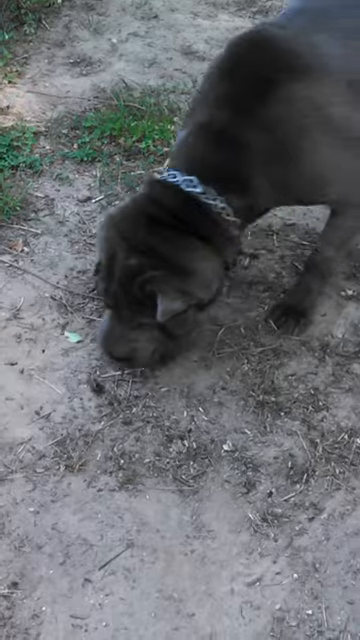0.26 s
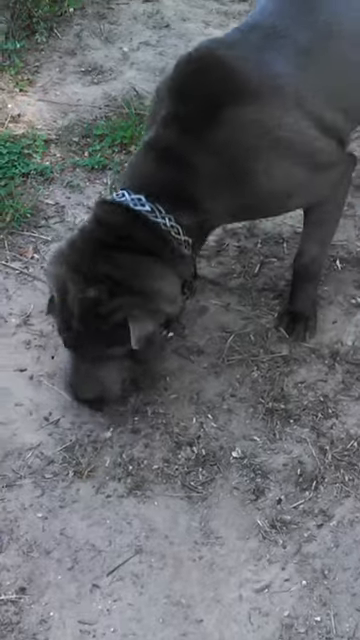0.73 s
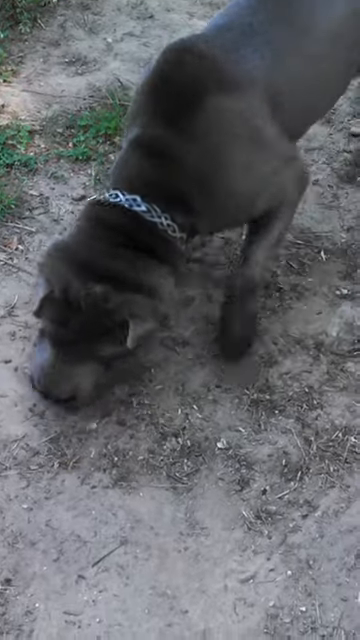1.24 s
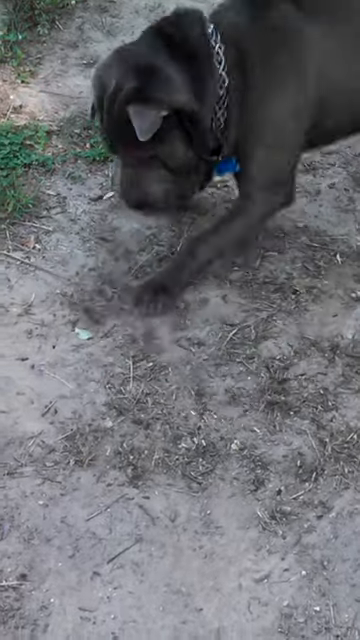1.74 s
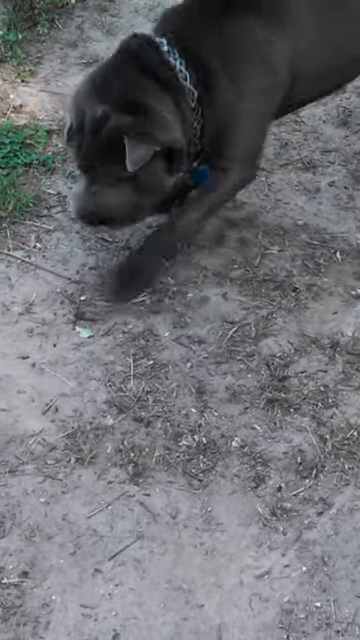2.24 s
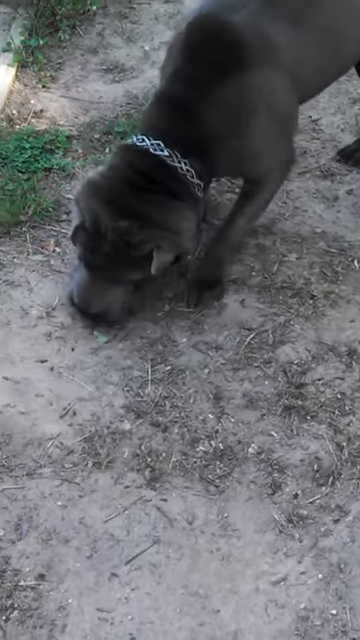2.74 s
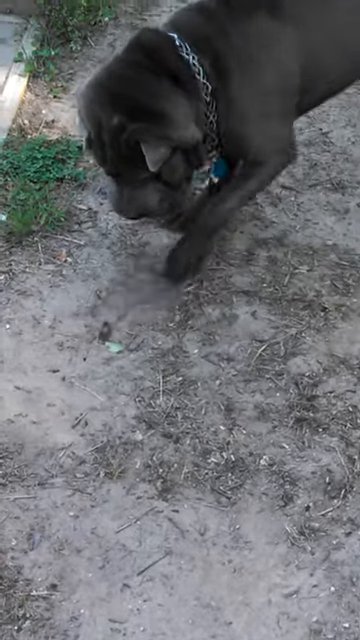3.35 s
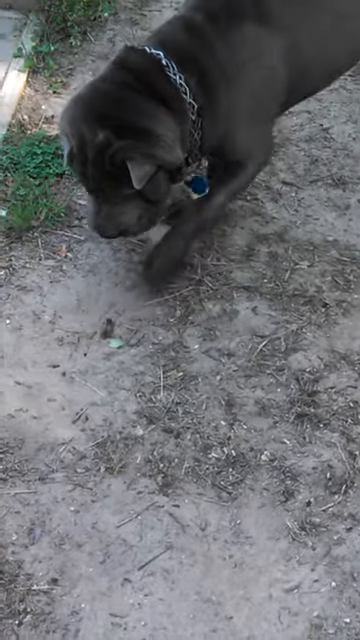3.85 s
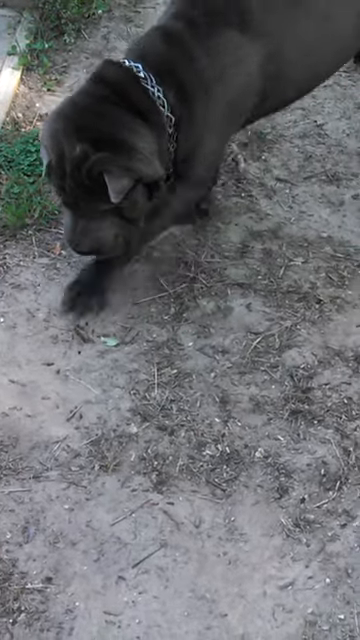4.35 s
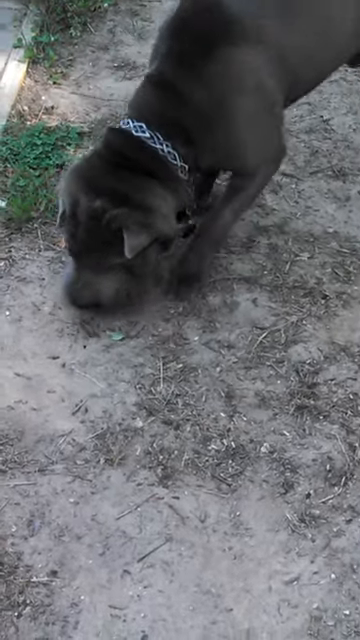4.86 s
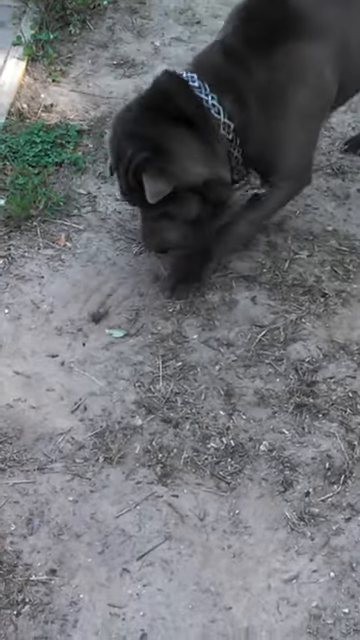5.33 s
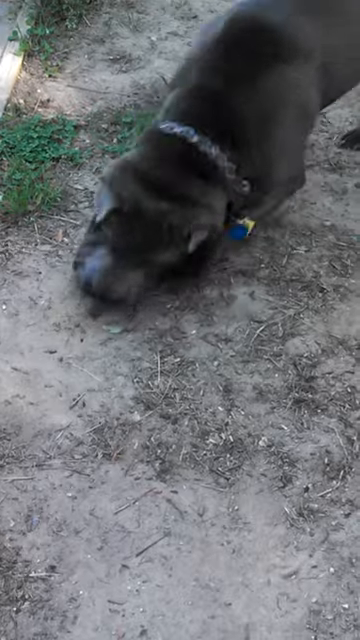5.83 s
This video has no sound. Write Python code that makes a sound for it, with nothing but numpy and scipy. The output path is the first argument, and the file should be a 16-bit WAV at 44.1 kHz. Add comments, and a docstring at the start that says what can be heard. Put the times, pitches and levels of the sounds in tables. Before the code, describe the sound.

Outdoors, a handheld phone catches a dog scratching and nosing in dry dirt. Soft scuffs come first, then bright collar-tag clinks and one hard tap near one and a half seconds. Pawing grows stronger and grittier from the middle onward, with dry twig cracks and short breathy sniffs. Small birds chirp and whistle behind, over a steady distant machine drone.

```python
"""Metal collar tags clink while a dog paws and noses through dry dirt and twigs; a machine drones far off,
small birds whistle, something taps sharply once. Drone, air, grit and breath are noise filtered into bands
and resonances; tags are decaying modes; birds are gliding near-sines; cracks are filtered bursts of impulses.
A handheld phone hears it at two ports, the left one facing the dog, and widens its stereo by taking
a delayed copy of each port from the other."""
import sys
import numpy as np
from scipy import signal
from scipy.fft import rfft, irfft, next_fast_len
from scipy.io import wavfile
from scipy.ndimage import uniform_filter1d

SR = 44100
rng = np.random.default_rng(int(sys.argv[2]) if len(sys.argv) > 2 else 0)


def log_audio(samples):
    """Write samples as a 16-bit WAV file to the path given in sys.argv[1]."""
    # one column per channel
    frames = np.atleast_2d(samples).T
    # limit to full scale, then quantise
    limited = np.clip(frames, -1, 1)
    pcm = np.round(limited * 32767).astype(np.int16)
    wavfile.write(sys.argv[1], SR, pcm)


def level_to_linear(level):
    """Convert decibel levels to linear amplitude factors, elementwise."""
    exponent = np.asarray(level, float) / 20
    return 10 ** exponent


N = 268569
TIME = np.arange(N) / SR
SIZE = next_fast_len(N)
FREQ = np.maximum(np.arange(SIZE // 2 + 1) * SR / SIZE, 1)
TOP_HZ = 15550  # top of the band


def on_log(table, column):
    """Interpolates a table column over log frequency, as hearing spaces pitch."""
    rows = np.array(table, float)
    return np.interp(np.log(FREQ), np.log(rows[:, 0]), rows[:, column])


def colour(x, db):
    """Linear filtering: weighs each spectral bin by its dB and removes all above the top of the band."""
    return irfft(rfft(x, SIZE) * level_to_linear(db) * (FREQ < TOP_HZ), SIZE)[..., :N]


def walk(rate):
    """Slow random modulation: levels held 1 / rate s, then slewed twice; spread near 1."""
    hold = int(SR / rate)
    steps = np.repeat(rng.standard_normal(N // hold + 1), hold)
    return 1.713 * uniform_filter1d(uniform_filter1d(steps, hold), hold)[:N]


def facing(x, other, lag_ms, far_db, alike):
    """Arrival delay, shadowing and coherence: the right port hears x later, weaker, partly by other paths."""
    alike = np.clip(alike, 0, 1)
    late = np.interp(TIME - lag_ms / 1000, TIME, x)
    right = level_to_linear(far_db) * (alike * late + np.sqrt(1 - alike ** 2) * other)
    return np.array([x, right])


def bounces(t, length_s):
    """Repeated impact: a first strike and quick, exponentially fading bounces; energy 1."""
    hits = rng.standard_normal(len(t)) * (rng.random(len(t)) < .2) * np.exp(-t / length_s)
    hits[0] += 2.2
    return hits / np.sqrt(np.sum(hits ** 2))


def air():
    """Resonance and coherence: noise through drone resonances, shared between the ports band by band."""
    # outdoor air at the ports: pitch_hz, half_sum_db_per_hz, half_difference_db_per_hz,
    # lean (-1 to 1, positive to the left)
    air_bands = [(20, -100, -99, -0.038), (45.4, -60, -69.5, 0.13), (124, -46.5, -69, 0.34),
                 (251.6, -71, -83.5, 0.31), (449, -76.5, -83.5, 0.39), (648, -83, -92, 0.29),
                 (1227, -86, -84, 0.55), (1720, -95.5, -91, -0.45), (3150, -96, -101.5, 1),
                 (5300, -100, -101, 1), (8300, -101.5, -99.5, 0.53), (11250, -103, -102, 0.69),
                 (13000, -95, -93, -0.42), (16300, -99, -106, -.2)]
    # drone resonances: pitch_hz
    drone_hz = [128, 190, 229, 365, 447, 475, 560, 600, 639, 680, 710, 748, 796, 830, 866, 950, 982, 1100,
                1172, 1303, 1362, 1490, 1570, 1721]
    # the same resonances: width_hz (at half height), level_db (over the air; negative is a hollow)
    drone_shape = [(127, -20), (11.8, 3), (9, 10.5), (10, 9.5), (8, 10.5), (8, 0.5), (10, 13), (11.6, 14.5),
                   (9.9, 13.5), (11.9, 12), (12, 11), (10, 8.5), (7.9, 12.5), (8, 1), (10, 4.5), (12, 3),
                   (10, 7.5), (20, 7.5), (14, 6), (28, 10.5), (16, 7), (8, 9), (20, 6.5), (20, 11)]
    lead_hz = 900  # below this the lean is an earlier arrival, above it a louder port

    ring = 0
    for hz, (width, db) in zip(drone_hz, drone_shape):
        ring = ring + (level_to_linear(db) ** 2 - 1) / (1 + ((FREQ - hz) / (width / 2)) ** 2)
    white = rng.standard_normal((2, N)) * np.sqrt(SR / 2)  # 0 dB per Hz
    one, two = colour(white, 10 * np.log10(np.maximum(1 + ring, .1)))

    lean = np.clip(on_log(air_bands, 3), -1, 1)
    shared = rfft(one, SIZE) * lean * np.where(FREQ < lead_hz, 1j, 1)  # 1j: a quarter-cycle phase shift
    separate = rfft(two, SIZE) * np.sqrt(1 - lean ** 2)
    apart = irfft(shared + separate, SIZE)[:N]
    mid = colour(one, on_log(air_bands, 1))
    side = colour(apart, on_log(air_bands, 2))
    return np.array([mid + side, mid - side]) * level_to_linear(0.44 * walk(3.136))


def hum():
    """Frequency and amplitude modulation: the drone's one steady note drifts and flutters a little."""
    # course of the note before its drift: time_s, pitch_hz
    hum_course = [(0, 330), (3.8, 331), (4.2, 334), (5.6, 333.5), (6.09, 330.5)]
    level_db, drift_hz, flutter_db = -44.8, 1.3, 2.3
    pitch = np.interp(TIME, *np.transpose(hum_course)) + drift_hz * walk(1.458)
    return level_to_linear(level_db + flutter_db * walk(10)) * np.sin(2 * np.pi * np.cumsum(pitch) / SR)


def chatter():
    """Modulated narrow-band noise: far small birds blur into chirps that come and go in a few ranges."""
    # ranges: centre_hz, width_hz (distance at which the range is 4.3 dB down), level_db (before flutter)
    ranges = [(2370, 350, -60.5), (3080, 170, -65.5), (4300, 820, -71), (5000, 140, -71.5)]
    out = 0
    for hz, width, db in ranges:
        blur = colour(rng.standard_normal((2, N)), -4.3 * ((FREQ - hz) / width) ** 2)
        flutter = level_to_linear(2.2 * walk(30) + walk(2))
        out = out + level_to_linear(db) * blur / blur.std() * flutter
    return out


def glides(calls):
    """Exponential pitch relaxation: falls drop fast and level out, rises climb almost evenly."""
    u, notes = np.linspace(0, 1, 40), []
    for s, length, from_hz, to_hz, db in calls:
        settle = .3 if from_hz > to_hz else 3.  # time constant as a share of the call
        left = (np.exp(-u / settle) - np.exp(-1 / settle)) / (1 - np.exp(-1 / settle))
        notes.append((s, length, to_hz + (from_hz - to_hz) * left, db))
    return notes


def birds(notes, rough_db, wobble_hz, right_db, lag_ms, trees_db):
    """Modulation and scattering: near-sines flutter in level and pitch, and the trees smear them."""
    song, wobble = np.zeros(N), wobble_hz * walk(600)
    for s, length, hz, db in notes:
        now = (TIME >= s) & (TIME < s + length)
        t = TIME[now]
        ends = np.clip(np.minimum(t - s, s + length - t) / min(.007, length / 4), 0, 1)
        pitch = np.interp(t, np.linspace(s, s + length, len(hz)), hz) + wobble[now]
        song[now] += ends * level_to_linear(db) * np.sin(2 * np.pi * np.cumsum(pitch) / SR)
    song = song * level_to_linear(rough_db * walk(60))
    # the left port hears the song later, the right one louder
    direct = np.array([np.interp(TIME - lag_ms / 1000, TIME, song), level_to_linear(right_db) * song])
    echo = rng.standard_normal((2, 6000)) * np.exp(-TIME[:6000] / .03) * level_to_linear(trees_db)
    return direct + signal.fftconvolve(song[None], echo, axes=1)[:, :N]


def whistles():
    """Tonal calls as pitch contours: evenly repeated falling cheeps, clear slurs and dipping whistles."""
    # one bird's repeated cheep: length_s, from_hz, to_hz, level_db
    length, from_hz, to_hz, db = (.08, 2250, 1800, -64.5)
    first_s, every_s, count = -.015, .34, 7
    # clear slurs up or down: start_s, length_s, from_hz, to_hz, level_db
    slurs = [(0.15, 0.17, 2600, 2540, -63), (.41, 0.036, 2700, 2600, -66), (0.59, 0.065, 1920, 3330, -53.5),
             (0.867, 0.038, 3350, 2940, -53.5), (0.892, 0.068, 2430, 2270, -52.5),
             (1.115, 0.07, 1896, 3300, -53), (1.178, 0.052, 3240, 2950, -57),
             (1.85, 0.055, 2400, 2570, -63), (1.9, .065, 2460, 2270, -59), (2.006, 0.075, 3000, 2430, -62),
             (2.053, 0.052, 2120, 2400, -53.5), (2.41, 0.055, 2510, 2320, -52.5),
             (2.45, 0.39, 2510, 2520, -67), (3.208, 0.17, 3170, 2500, -52.5),
             (3.697, 0.036, 2720, 2680, -58), (3.743, 0.042, 3660, 3730, -66),
             (3.787, 0.019, 2170, 2080, -55), (3.797, 0.039, 3140, 3230, -54.5),
             (3.836, .012, 3150, 2900, -54), (3.5, .03, 2250, 2150, -56), (3.895, .02, 1755, 1650, -55),
             (3.908, 0.084, 3330, 2620, -54), (3.985, 0.045, 2510, 2446, -55),
             (4.06, .032, 2480, 2490, -61), (3.993, 0.095, 3150, 3020, -59),
             (5.225, 0.017, 2350, 2240, -52), (5.47, .05, 2550, 2480, -64), (5.392, .15, 2940, 3026, -61.5),
             (5.646, 0.13, 3040, 2960, -61), (5.88, .2, 2950, 3020, -60), (5.445, 0.018, 2500, 2250, -51),
             (5.83, 0.018, 2200, 2110, -52), (6.02, 0.072, 2470, 2520, -58.5)]
    # a whistle that dips and rises again: share (of the note, 0 to 1), pitch_hz
    dip_shape = [(0, 2150), (.08, 2450), (.2, 2250), (.4, 2146), (.6, 2195), (.87, 2430), (1, 2340)]
    # dipping whistles: start_s, length_s, level_db
    dip_whistles = [(2.87, .18, -56), (3.495, .175, -55.5)]

    notes = [(first_s + k * every_s, length, [from_hz, to_hz], db) for k in range(count)]
    notes += glides(slurs)
    dip_hz = np.interp(np.linspace(0, 1, 40), *np.transpose(dip_shape))
    notes += [(s, length, dip_hz, db) for s, length, db in dip_whistles]
    return birds(notes, rough_db=2.8, wobble_hz=45, right_db=7, lag_ms=.05, trees_db=-30)


def peeps():
    """Random frequency modulation: a wider pitch wobble makes thinner, hoarser, higher calls."""
    # calls: start_s, length_s, from_hz, to_hz, level_db
    calls = [(.3, 0.059, 4150, 4030, -63.5), (.435, 0.081, 5750, 5670, -62), (.15, .06, 5400, 5250, -61),
             (.57, 0.074, 5090, 4830, -52), (.62, 0.061, 4900, 4590, -62), (.77, 0.13, 4090, 4000, -66),
             (.85, 0.13, 5750, 5500, -49.5), (3.3, 0.13, 4300, 3930, -64.5), (3.66, 0.056, 3980, 4100, -64),
             (3.7, 0.11, 4450, 4250, -63.5), (3.72, 0.042, 4130, 4100, -68), (3.69, 0.052, 4800, 4600, -69),
             (3.84, 0.043, 4300, 4040, -71), (3.93, 0.043, 4600, 4040, -77), (3.79, 0.027, 5050, 5450, -49),
             (3.815, 0.045, 5450, 5270, -57), (4.23, 0.033, 4150, 4000, -67),
             (4.58, 0.055, 5600, 5600, -63), (5.44, .07, 5550, 5500, -65), (5.58, 0.086, 4200, 4080, -66),
             (5.96, .07, 3650, 3830, -65), (5.995, 0.036, 4500, 4650, -60), (5.73, 0.068, 5400, 5320, -61),
             (6.01, 0.2, 4950, 5000, -58), (6.04, 0.046, 5550, 5640, -46.5)]
    return birds(glides(calls), rough_db=2.1, wobble_hz=68.6, right_db=6, lag_ms=0.025, trees_db=-25)


def strokes():
    """Power addition: strokes swell, hold and die over a faint shuffle; returns treble and lower gains."""
    # paw strokes and nosing in the dirt: start_s, length_s, level_db (of the treble),
    # brightness_db (treble gain over lower gain)
    paw_strokes = [(0.335, 0.1, -54.5, -10), (0.618, 0.31, -56.5, -10), (0.979, 0.27, -48.5, -5),
                   (1.114, 0.49, -56.5, -3), (1.435, 0.26, -46.5, 1.5), (2.085, 0.11, -52.5, 1),
                   (2.155, 0.2, -58, 6), (2.21, 0.032, -52, 14), (2.373, 0.091, -65, 1),
                   (2.685, 0.15, -60, 1), (2.864, 0.073, -56.5, 9), (2.948, 0.48, -52.5, -4),
                   (3.422, 0.18, -43, -1.5), (3.622, 0.12, -53, 6), (3.811, 0.24, -45, 2),
                   (4.02, 0.14, -53, 7), (4.138, 0.11, -51, 1), (4.23, 0.22, -40.5, 2),
                   (4.336, 0.19, -44, 14), (4.802, 0.13, -55.5, 10), (4.918, 0.12, -48.5, 14),
                   (5.082, 0.17, -42, -1), (5.163, 0.22, -46, -4.5), (5.476, 0.22, -52, -1),
                   (5.634, 0.053, -53, 9), (5.695, 0.064, -61, 7), (5.791, 0.064, -47, 15),
                   (5.843, 0.18, -57, 10), (5.976, 0.51, -47, 1)]
    rise, fall = 0.26, 0.39  # shares of a stroke's length
    shuffle_db, shuffle_bright_db = -70.5, 28  # faint steady shifting
    high, low = level_to_linear(shuffle_db) ** 2, level_to_linear(shuffle_db - shuffle_bright_db) ** 2
    for s, length, db, bright_db in paw_strokes:
        u = (TIME - s) / length
        swell = np.clip(np.minimum(u / rise, (1 - u) / fall), 0, 1)
        power = swell ** 4 * level_to_linear(db) ** 2
        high, low = high + power, low + power / level_to_linear(bright_db) ** 2
    return np.sqrt(high), np.sqrt(low)


def scuff():
    """Granular friction: dense random grit grains over a dusty hiss that clumps band by band."""
    # tint of the grit: pitch_hz, level_db
    tint = [(600, -38), (1500, -2.5), (3400, 1), (4800, -3), (6500, -1), (9000, 5.5), (10500, 0),
            (11700, 0), (13100, 0), (15400, 2)]
    high_gain, low_gain = strokes()

    chosen = rng.random((2, N)) < 2500 / SR  # about 2500 grains a second at each port
    sizes = level_to_linear(3.2 * np.minimum(rng.exponential(size=(2, N)), 3.8))
    grains = rng.standard_normal((2, N)) * chosen * sizes

    dust, edges = rfft(rng.standard_normal((2, N)), SIZE), np.geomspace(1500, 16000, 9)
    clumps = 0
    for lo, hi in zip(edges, edges[1:]):
        band = irfft(dust * (FREQ >= lo) * (FREQ < hi), SIZE)[:, :N]
        clumps = clumps + band * level_to_linear(2.5 * walk(25))

    grit = level_to_linear(-3) * grains / grains.std() + clumps * level_to_linear(1.5 * walk(50))
    grit = colour(grit, on_log(tint, 1))
    low = signal.sosfilt(signal.butter(2, 5600, fs=SR, output="sos"), grit)
    grit = low * low_gain + (grit - low) * high_gain
    return facing(grit[0], grit[1], lag_ms=0.18, far_db=-31, alike=0.08)


def tags():
    """Modal vibration: each clink cracks and rings the modes of the tags; fur damps the ring."""
    # tag modes: pitch_hz
    mode_hz = [8550, 10310, 10540, 11705, 12170, 12610, 14760, 14895, 15000]
    # the same modes: t60_s (at freedom 1), level_db (added to the clink's group level)
    mode_decay = [(0.04, -9), (0.045, 4), (.025, -3), (0.04, 5), (.06, 2), (.035, -4), (0.04, -1), (.04, 4),
                  (.05, -1)]
    # the same modes: group (0 low, 1 middle, 2 top)
    mode_group = [0, 0, 0, 1, 1, 1, 2, 2, 2]
    # clinks: start_s, crack_peak_db, low_db, middle_db, top_db (mode groups),
    # freedom (to ring; multiplies t60, at most 2)
    clinks = [(0.1126, -30, -57, -55, -54, .4), (1.429, -28, -56, -46, -43, 0.32),
              (1.5155, -30, -50, -54, -36, .3), (1.524, -30, -26.5, -33, -47, 1.1),
              (1.532, -33, -42, -38, -36, .5), (1.541, -46, -50, -43, -45, 1.),
              (1.5918, -25, -44, -26, -42, 0.45), (1.5958, -34, -46, -42, -42, .6),
              (1.625, -46, -48, -56, -56, .4), (2.112, -44, -47, -50, -50, 0.72),
              (2.234, -46, -51, -52, -41, 1), (2.2479, -16, -33, -23, -30, 0.76),
              (2.2532, -34, -42, -40, -36, .6), (2.2625, -33, -38, -41, -40, 1.4),
              (2.3, -34, -46, -39, -50, .2), (2.3465, -46, -58, -49, -56, 1.5),
              (2.4094, -57, -62, -53, -66, 0.37), (2.4445, -40, -65, -54, -54, .5),
              (2.456, -48, -53, -54, -54, 0.71), (2.923, -26, -56, -37.5, -60, 0.61),
              (3.04, -38, -45, -42, -54, 0.57), (3.6425, -36, -43, -43, -38, .3),
              (3.6693, -31, -37, -29, -39, .5), (3.677, -50, -32, -57, -40, 2.5),
              (3.702, -40, -47, -42, -51, 0.55), (3.716, -42, -56, -43, -58, .3),
              (4.0425, -44, -51, -53, -49, 0.55), (4.139, -45.5, -44.5, -53, -47, 0.97),
              (4.181, -34, -40, -34, -42, .3), (4.201, -26, -38, -42, -48, .35),
              (4.5755, -16.5, -53, -36, -53, 0.34), (5.177, -40, -60, -43, -58, .4),
              (5.29, -50, -47, -62, -56, .8), (5.498, -52.5, -62, -38, -55, 0.81),
              (5.5514, -46, -56, -48, -54, .7), (5.644, -40, -44, -52, -45, .3),
              (5.649, -16, -29, -47, -32, .35), (5.6515, -26, -29, -46, -35, 0.33),
              (5.6543, -17, -32, -35, -34, 0.31), (5.66, -38, -52, -47, -52, .25),
              (5.711, -32, -40.5, -49, -43, 2.4), (5.715, -40, -39, -40, -47, 0.71),
              (5.7814, -46, -60, -53, -52, .4), (5.805, -27, -52, -48, -52, .3),
              (5.8309, -15, -53, -32.5, -47, 0.47), (6.066, -21, -33, -35, -47, .25)]
    scatter_db, detune = 2, .003  # every blow lands elsewhere

    count = 8000
    out, t = np.zeros((2, N + count)), TIME[:count]
    crack = signal.butter(2, 6500, "high", fs=SR, output="sos")
    for s, crack_db, *group_db, free in clinks:
        chance = rng.standard_normal((len(mode_decay), 2))
        ring = 0
        for hz, (t60, db), group, (a, b) in zip(mode_hz, mode_decay, mode_group, chance):
            level = level_to_linear(db + group_db[group] + scatter_db * a)
            decay = np.exp(-np.log(1000) * t / (t60 * np.clip(free, .08, 2)))
            ring = ring + level * decay * np.sin(2 * np.pi * hz * (1 + detune * b) * t)
        start = int(s * SR)
        for port in range(2):
            hits = bounces(t, length_s=0.002)
            snap = signal.sosfilt(crack, hits)
            struck = 0.24 * ring + 0.86 * signal.fftconvolve(hits, ring)[:count]
            out[port, start:start + count] += level_to_linear(crack_db) * snap / np.abs(snap).max() + struck
    return facing(out[0, :N], out[1, :N], lag_ms=0.46, far_db=-11.0, alike=0.19)


def sniffs():
    """Turbulence noise in a resonance: air is forced through the nostrils in breathy puffs."""
    # puffs: start_s, length_s, centre_hz, width_hz (distance at which it is 12 dB down),
    # level_db (before flutter)
    puffs = [(0.966, .12, 6460, 700, -50), (4.262, 0.23, 6700, 1200, -48), (5.11, 0.24, 6840, 900, -48.5)]
    out = 0
    for s, length, hz, width, db in puffs:
        puff = colour(rng.standard_normal((2, N)), np.maximum(-12 * ((FREQ - hz) / width) ** 2, -90))
        swell = np.sin(np.pi * np.clip((TIME - s) / length, 0, 1)) ** 0.53
        out = out + level_to_linear(db + 2.1 * walk(40)) * puff / puff.std() * swell
    return facing(out[0], out[1], lag_ms=0.089, far_db=-7, alike=0.68)


def twigs():
    """Broad-band fracture: twigs and grit crack dry under the paws, wide in band and without ring."""
    # cracks: start_s, peak_db (at the left port), centre_hz (nominal), length_ms (decay constant)
    cracks = [(1.073, -24, 6050, 4.9), (1.081, -34, 4300, 3), (1.1155, -37, 3930, 1.5),
              (1.138, -29, 4340, 3.1), (1.4965, -33, 8990, 2.2), (1.657, -27, 4470, 2.8),
              (1.679, -34, 4400, 3.2), (2.248, -44, 6040, 1.1), (2.879, -23, 7440, 4),
              (2.922, -41, 7280, 1.5), (2.992, -39.5, 4290, 2.1), (3.6696, -33, 5500, 1.7),
              (3.7903, -22.5, 6850, 3.4), (3.898, -22, 9770, 1.7), (3.9, -26.5, 2300, 5.4),
              (4.289, -22, 9330, 1.5), (4.31, -21, 8970, 1.5), (4.5756, -25, 4720, 4.2),
              (4.613, -26, 4300, 3.7), (5.1744, -30, 9560, 1.5), (5.4494, -50, 4190, 1.5),
              (5.6038, -28, 4180, 1.9), (5.6497, -37, 5500, 3), (5.71, -30, 5000, 1.7),
              (5.8307, -20, 5000, 7.9), (6.071, -41, 9000, 1.5), (6.0748, -23, 9270, 1.1)]
    count = 2000
    out, t = np.zeros((2, N + count)), TIME[:count]
    for s, db, hz, length_ms in cracks:
        edges = [hz / 2.2, min(hz * 1.6, 18000)]
        band = signal.butter(1, edges, "bandpass", fs=SR, output="sos")
        start = int(s * SR)
        for port in range(2):
            snap = signal.sosfilt(band, bounces(t, max(length_ms, .2) / 1000))
            out[port, start:start + count] += level_to_linear(db) * snap / np.abs(snap).max()
    return facing(out[0, :N], out[1, :N], lag_ms=0.38, far_db=-11.0, alike=1.0)


def thump():
    """Damped oscillation: a paw landing draws one dull, short note from the packed soil."""
    # the landing: start_s, pitch_hz, level_db (at the left port, before decay), t60_s
    s, hz, db, t60 = (1.253, 540, -26, .045)
    t = np.maximum(TIME - s, 0)
    onset, decay = np.clip(t / 0.0021, 0, 1), np.exp(-np.log(1000) * t / t60)
    return level_to_linear(db) * onset * decay * np.sin(2 * np.pi * hz * t) * np.array([[1], [.6]])


def taps():
    """Contact impulse and rebound: a short push on both ports, a sharp opposite rebound at the left one."""
    # taps: start_s, level_db (at the right port), contact_ms, rebound_after_ms, rebound_db
    contacts = [(1.448, -8.5, 0.83, 0.914, -7)]
    out = np.zeros((2, N))
    for s, db, contact_ms, later_ms, rebound_db in contacts:
        ms = (TIME - s) * 1000
        push = np.clip(ms / 0.13, 0, 1) * np.clip((contact_ms - ms) / 0.53, 0, 1)
        out += level_to_linear(db) * push * np.array([[.75], [1]])
        out[0] -= level_to_linear(rebound_db) * np.exp(-np.abs(ms - later_ms) / 0.044)
    return out


def dips():
    """Gain modulation: the background level drops suddenly, then recovers at a steady rate in dB."""
    # drops: start_s, drop_db (added to what is still unrecovered)
    drops = [(1.525, 7.5), (1.594, 3), (2.248, 13.5)]
    creep_db_per_s = 10.5
    db, owed, last = np.zeros(N), 0., 0.
    for s, drop_db in drops:
        owed = max(owed - creep_db_per_s * (s - last), 0) + drop_db
        last = s
        after = TIME >= s
        db[after] = -np.maximum(owed - creep_db_per_s * (TIME[after] - s), 0)
    return level_to_linear(uniform_filter1d(db, size=200))


def scene():
    """Superposition: all sources add at the two ports; only the background dips."""
    background = air() + hum() + chatter() + whistles() + peeps()
    dog = scuff() + tags() + sniffs() + twigs() + thump()
    return background * dips() + dog + taps()


def roll_off(x):
    """The treble ends steeply here."""
    return signal.sosfilt(signal.butter(12, 16820, fs=SR, output="sos"), x)


def record(dry):
    """Comb filtering: each channel loses a delayed copy of the other port; low-passes then end the band."""
    lag = 16  # samples
    balance_db = -1.3  # left gain over right gain
    late = np.pad(dry, ((0, 0), (lag, 0)))[::-1, :N]  # ports swapped
    wide = (dry - late) * level_to_linear(balance_db * np.array([[.5], [-.5]]))
    wide = signal.sosfilt(signal.ellip(3, .3, 7, TOP_HZ, fs=SR, output="sos"), wide)
    wide = signal.sosfilt(signal.ellip(8, .3, 70, 16750, fs=SR, output="sos"), wide)
    return roll_off(wide)


dry = scene()
out = record(dry)
log_audio(out)
```